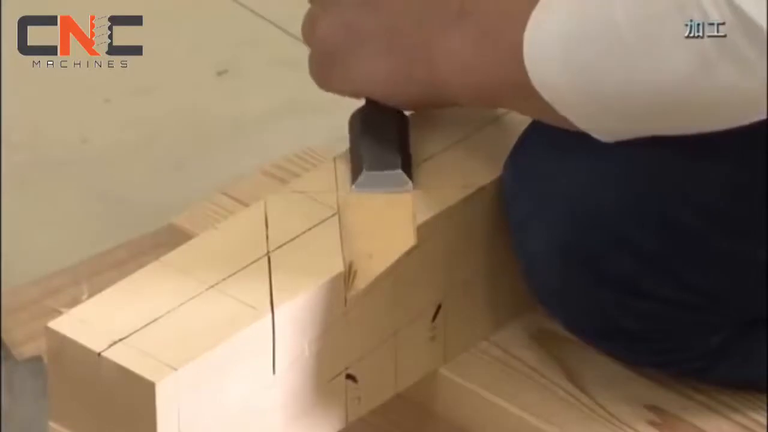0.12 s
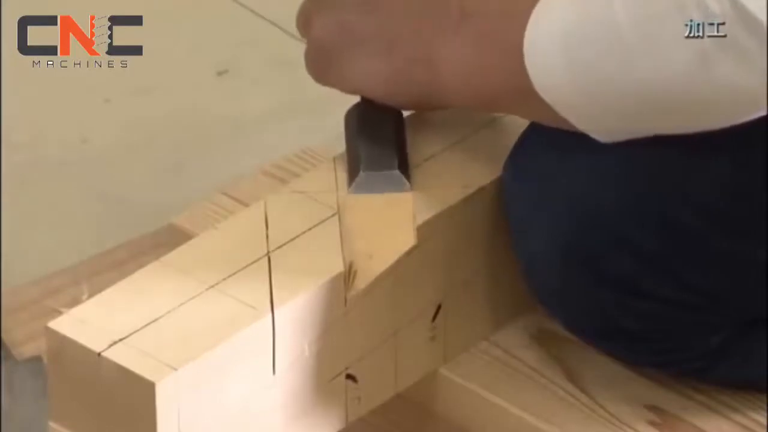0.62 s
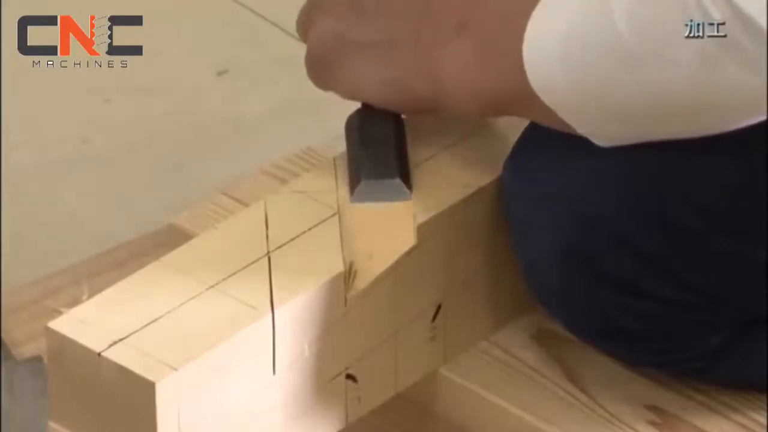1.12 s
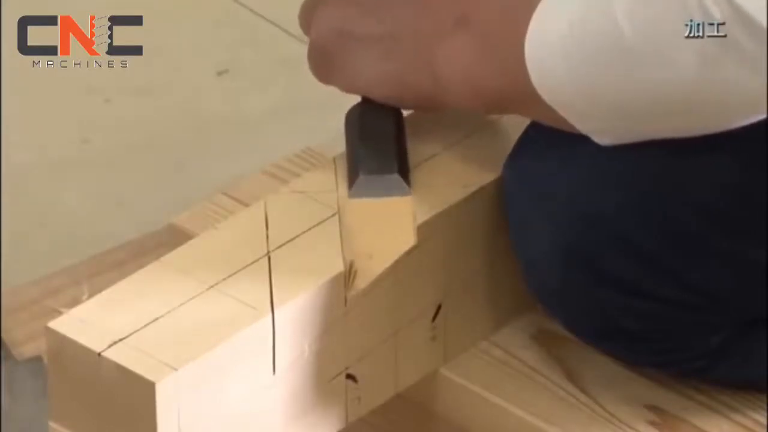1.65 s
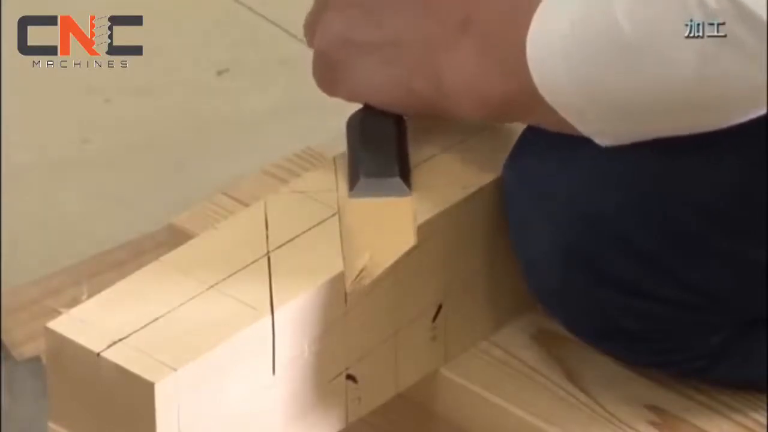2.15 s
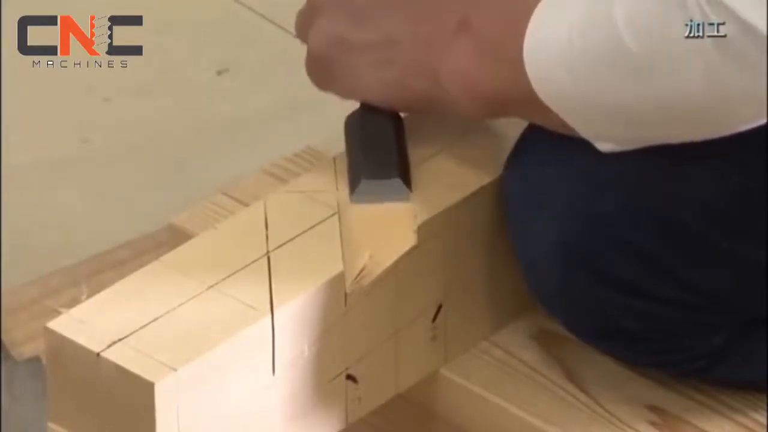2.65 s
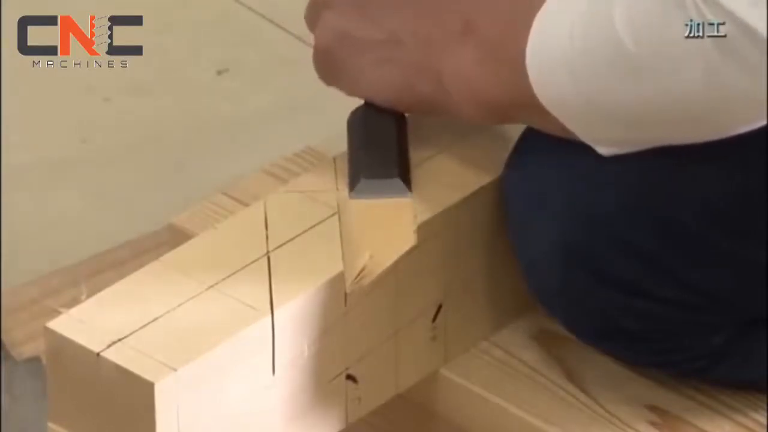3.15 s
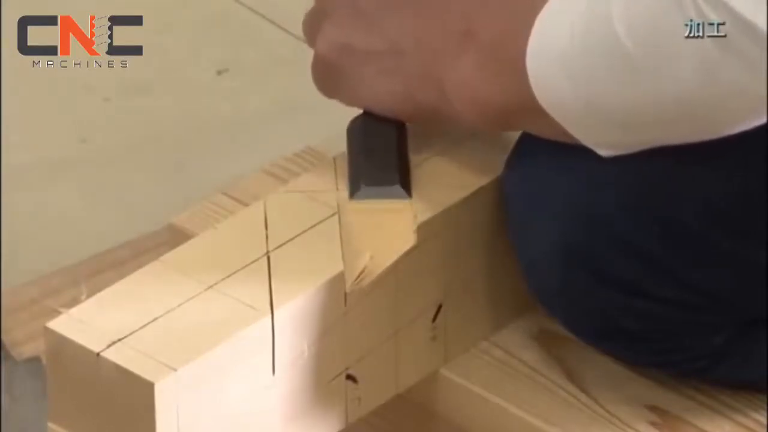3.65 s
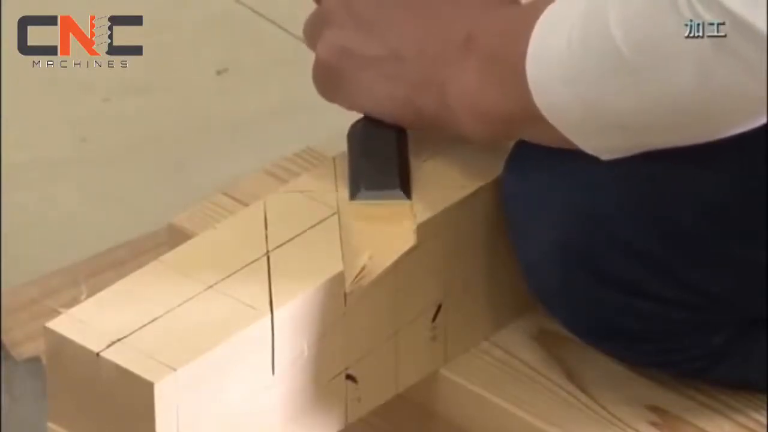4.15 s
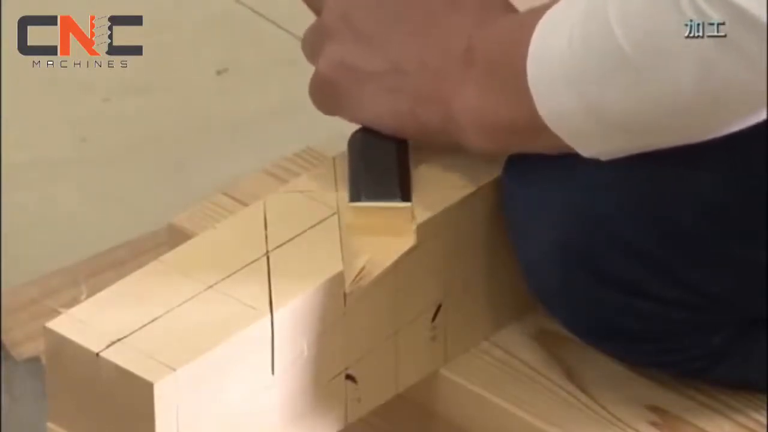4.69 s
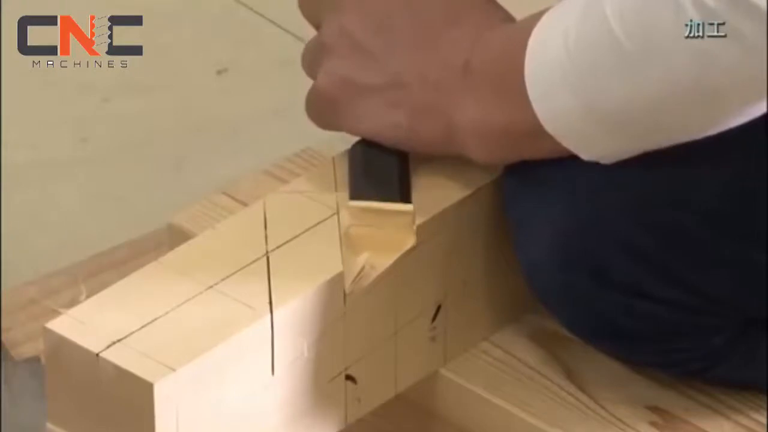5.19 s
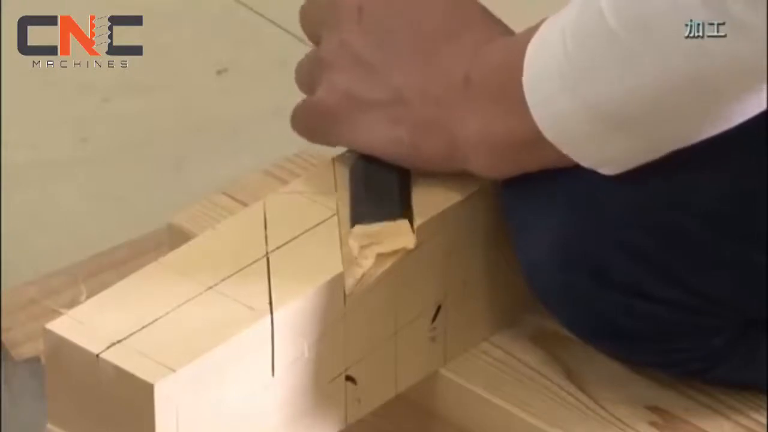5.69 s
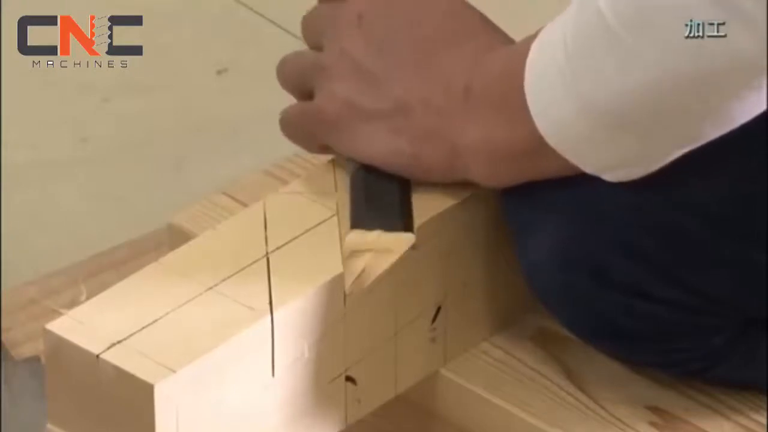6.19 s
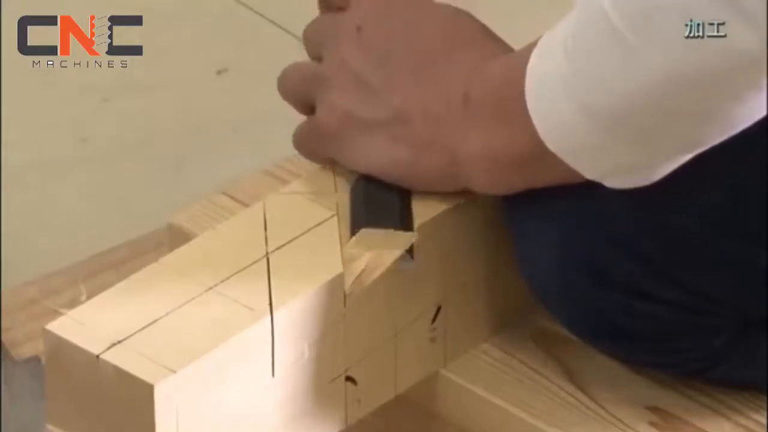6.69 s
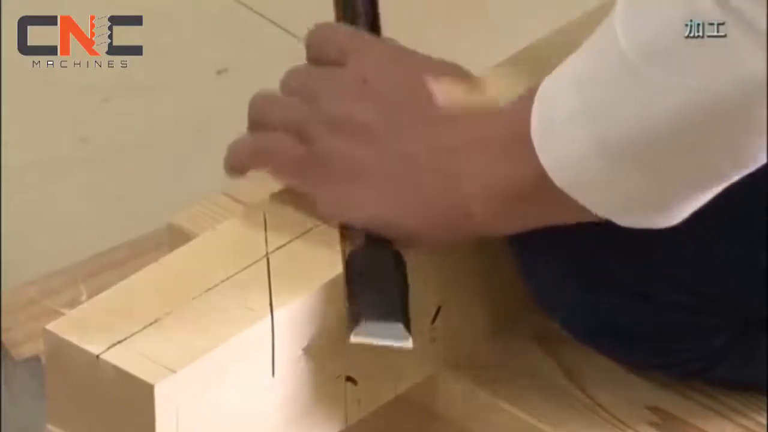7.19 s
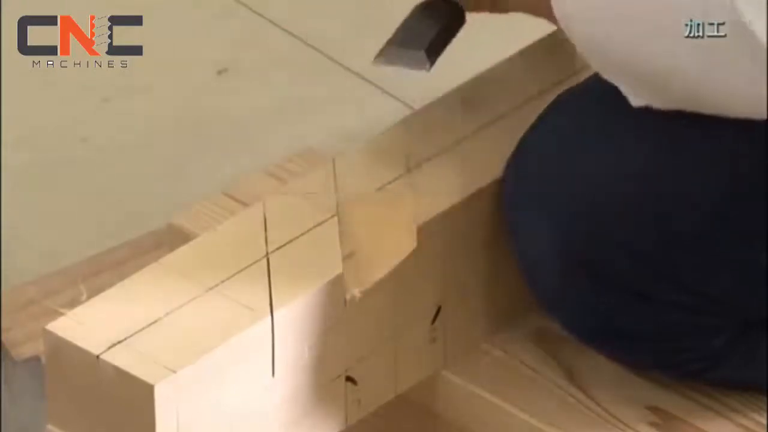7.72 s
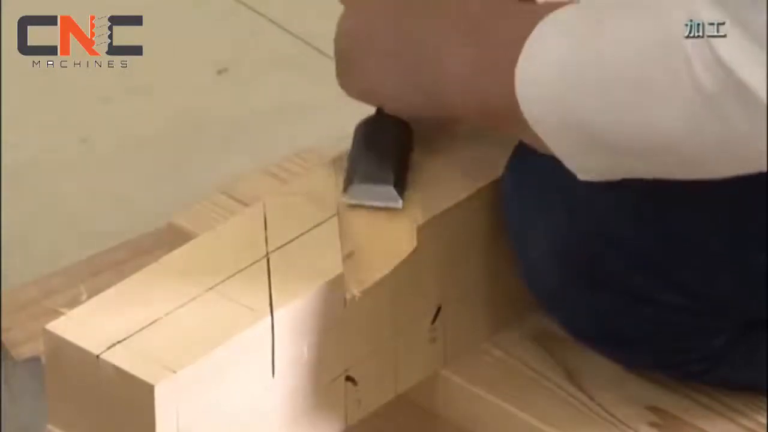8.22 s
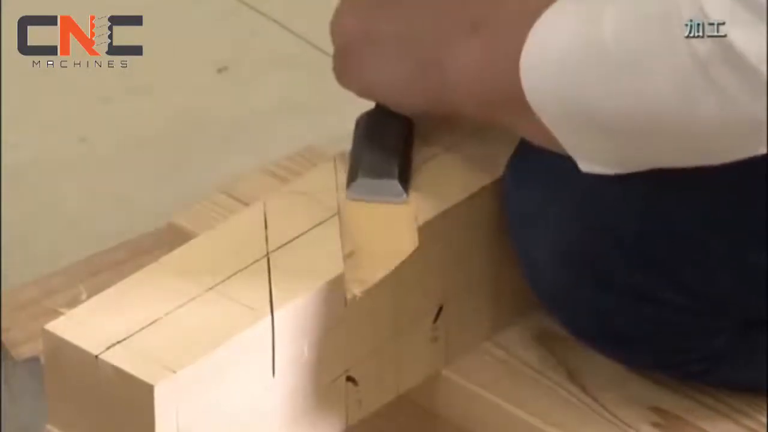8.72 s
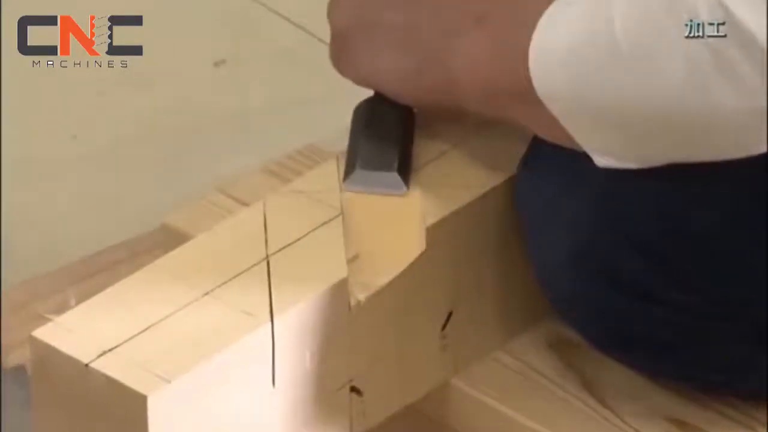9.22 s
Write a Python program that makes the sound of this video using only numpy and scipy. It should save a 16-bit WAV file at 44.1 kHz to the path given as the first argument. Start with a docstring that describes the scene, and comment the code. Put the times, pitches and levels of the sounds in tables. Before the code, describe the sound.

Quiet room hum, a low boom and dull knocks, then a single steel strike on a chisel bedded in a wooden beam, followed by bright rattling bounces of a wood scrap. After a pause the hammer falls four times a second or so, faster towards the end, with a tighter singing blade. Then small knocks and hand rubs on wood. Near microphone, echoing hall.

```python
"""Low workshop hum first, with small knocks and sleeve rustle. Then a steel hammer drives a wood chisel into a
timber beam in a large workshop: one blow, a loose offcut clattering down, a quickening run of blows, a few last
knocks and strokes. Struck bodies are sums of choked modes plus a noise crack; knocks are paired notes over noise;
hum, rustle and boom are shaped noise. Floor and bench echo the blows; a noise hall with a far wall rings on."""
import sys
import numpy as np
from scipy import signal
from scipy.fft import rfft, irfft
from scipy.io import wavfile
from scipy.ndimage import uniform_filter1d

SR = 44100
rng = np.random.default_rng(int(sys.argv[2]) if len(sys.argv) > 2 else 0)


def materialize(psi):
    """Save the field psi as 16-bit PCM at rate SR to the path in sys.argv[1].

    A 1-D psi becomes a single channel; in a 2-D psi each row is a channel.
    """
    bounded = np.clip(np.atleast_2d(psi).T, -1, 1)
    quanta = np.round(bounded * 32767).astype(np.int16)
    wavfile.write(sys.argv[1], SR, quanta)


N = 412335

# workshop hum spectrum: (frequency [Hz], relative density [dB per Hz])
HUM_SPECTRUM = [(20, -26.5), (45, -31), (75, -2), (130, -1.5), (200, -4), (350, -4), (530, -14.5),
                (1000, -17), (2000, -24), (4000, -26), (7300, -31.5), (11000, -42), (15000, -68)]
HUM_DB, HUM_WAVER_DB, HUM_WAVER_PER_S = -51.5, 1.2, 2.4

# sleeve and hand sweeping over timber: (middle [s], length [s], level [dB])
RUSTLE_STROKES = [(0.767, .1, -59), (0.924, 0.15, -56.5), (1.385, 0.094, -61), (2.87, 0.21, -57.5),
                  (2.976, .1, -60.5), (7.529, 0.16, -52.5), (7.69, 0.17, -53.5), (7.88, 0.09, -63.5),
                  (8.023, 0.21, -50), (8.21, 0.075, -64.5)]
# rustle spectrum: (frequency [Hz], relative density [dB per Hz])
RUSTLE_SPECTRUM = [(200, -25.5), (600, -7), (1500, -7), (3300, -7.5), (7900, -17.5), (14000, -42)]

# low booms near 190 Hz, the later ones faint: (time [s], level [dB])
LOW_BOOMS = [(0.115, -33.5), (0.275, -45), (0.58, -50), (8.48, -45.5)]
BOOM_HZ, BOOM_WIDTH_HZ = 188, 59
BOOM_RISE_S, BOOM_FADE_DB_PER_S = 0.019, 77

# dry chips snapping or landing: (time [s], level [dB])
CHIP_TICKS = [(2.965, -49.5), (7.238, -49.5), (7.434, -37), (7.582, -42.5), (7.618, -57)]
# tick spectrum: (frequency [Hz], relative density [dB per Hz])
TICK_SPECTRUM = [(300, -8), (1500, -3), (5500, -0.5), (9000, -11.5), (15000, -45.5)]
TICK_LAST_S, TICK_HALL_DB = 0.0045, -1

# small knocks of tool and timber:
# (time [s], level [dB], main note [Hz], second note [Hz], share sent to the hall [dB])
SMALL_KNOCKS = [(0.112, -35, 1640, 3390, 7.5), (.248, -34.5, 350, 1120, -9), (0.781, -40.5, 593, 185, 1.5),
                (1.269, -44, 362, 800, -13), (1.293, -34.5, 1730, 1165, -5),
                (1.356, -50.5, 3500, 1050, -0.8), (1.364, -49, 2524, 1500, 0),
                (2.286, -50, 1140, 408, 18.5), (2.707, -42, 836, 1385, -8), (2.745, -44.5, 361, 1030, -9),
                (7.06, -35, 1025, 630, -4), (7.256, -35, 292, 615, -14), (7.369, -43, 290, 550, 0),
                (7.434, -38.5, 654, 990, 4), (7.58, -43.5, 1075, 510, 5.5), (7.642, -41, 325, 507, -11),
                (7.662, -37, 232, 427, -8), (8.037, -46.5, 243, 494, 1.5), (8.249, -38, 330, 570, -2),
                (8.439, -41.5, 782, 1180, 3.5), (8.636, -41.5, 272, 780, -6), (8.739, -39.5, 303, 1007, -7)]
BODY_DB, BODY_DB_PER_OCTAVE = -6, 3   # noisy body at a main note of 1 kHz; higher knocks are noisier

# offcut bounces: (time [s], strength [dB], flat-face modes [dB re strength], top modes [dB re strength])
BOUNCES = [(2.306, -45, -1.5, -5), (2.3244, -11.5, -18, -21.5), (2.331, -12.5, -10, -29),
           (2.399, -13.5, -16.5, -3), (2.4215, -25.5, -14, -5), (2.428, -24, -7, -11),
           (2.489, -21, 2.8, -23), (2.518, -38.5, 10, -12), (2.54, -37.5, 8.5, -23), (2.564, -61, 26, -3)]
# offcut modes: (frequency [Hz], level [dB], lasting [s])
OFFCUT_MODES = [(638, 0, 0.0084), (1140, 0, 0.01), (1727, -2.5, 0.0094), (2750, -3, 0.012),
                (2907, -1.5, 0.0054), (3470, 7, 0.001), (3810, 3.5, 0.0029), (4450, -4, 0.0032),
                (5110, 2.5, 0.0045), (6240, -3, 0.0033), (7060, -4.5, 0.0038), (8440, -15.5, 0.0032)]
# borders between offcut mode groups: (frequency [Hz])
OFFCUT_BORDERS_HZ = [900, 2200, 3250, 4750]
MIDDLE_DB, LOWEST_DB = 1.5, -10.5   # middle modes lie between edge and face; the lowest follow them

# hammer blows: (time [s], strength [dB], handle ring [dB re strength], thump [dB re strength])
HAMMER_BLOWS = [(1.995, -11.5, 2.5, -32), (3.193, -13, -3.5, -7), (3.456, -13, -1.5, -31),
                (3.706, -17, 3, -27), (3.9785, -17.5, -1.3, -7), (4.2634, -15.5, -2.5, -10),
                (4.527, -14, 0.2, -12), (4.803, -14, 1, -34), (5.051, -14.5, 7, -27), (5.278, -15, 1, -30),
                (5.497, -16, -6, -39), (5.715, -15, -2.5, -30), (5.94, -14.5, -1.5, -21),
                (6.155, -15.5, -5, -16), (6.362, -17.5, -4, -35), (6.568, -17, 2, -5),
                (6.771, -16.5, -1.5, -17), (6.98, -18, -11, -10)]
# chisel and beam modes: (frequency [Hz], level [dB], lasting [s])
CHISEL_MODES = [(156.4, -11, 0.014), (299.4, -6, 0.011), (422, -8, 0.0044), (645, -9.5, 0.011),
                (963, -3.5, 0.0074), (1120, -5, 0.0053), (1707.5, 4, 0.0055), (2217, 5, 0.0047),
                (2380, 7.5, 0.0065), (2935, -8, 0.0066), (3270, -2.5, 0.0038), (4507, -7, 0.003),
                (5160, -15.5, 0.0042), (6756, -13.5, 0.0043), (11420, -32, 0.0036), (12700, -40, 0.01)]
# borders between thump, beam, handle, blade and upper modes: (frequency [Hz])
CHISEL_BORDERS_HZ = [220, 1400, 2000, 2600]
# the blade beds in, the beam answers more and the gripped blade sings, until the chip splits off:
# (time [s], beam modes [dB re strength], blade modes [dB re strength])
BLADE_BEDDING = [(2.0, -4.5, -28.5), (3.2, -2.5, -24), (3.6, -9, -38.5), (4.8, -5.5, -23.5),
                 (5.28, -1.5, -12), (5.5, -3.5, -8), (6.36, -3, -6.5), (6.77, -8.5, -19), (7.0, -6, -13.5)]
# crack of steel on steel and splitting fibres: (frequency [Hz], relative density [dB per Hz])
CRACK_SPECTRUM = [(100, -3.5), (400, -3), (1300, -2.5), (3200, -2.5), (5500, -9), (8000, -16.5),
                  (11000, -30), (13400, -40), (15500, -67)]
DETUNE, MODE_SPREAD_DB = 0.008, 2.9   # strike-to-strike spread of mode pitch [ratio] and level
BEAMING_HZ = 4000

# floor and bench: (delay [s], level [dB])
NEAR_ECHOES = [(0.0093, -13.5), (0.016, -25.5)]
# hall: (frequency [Hz], relative level [dB], t60 [s])
HALL_BANDS = [(100, -12.5, 0.58), (260.7, 4, 0.73), (722, 1.5, 0.53), (1800, -3.5, 0.65), (4650, -1, 0.55),
              (9160, 4, 0.37), (14030, 2.5, 0.2)]
HALL_DB, BASS_CUT_HZ = -8, 119
FAR_WALL_S, FAR_WALL_DB = 0.047, 2.25
CONTACT_SAMPLES = 2048


def from_db(db):
    """Decibels to gain."""
    return 10 ** (np.asarray(db) / 20)


def rms_one(x):
    """Scale to rms 1."""
    return x / np.sqrt(np.mean(x ** 2) + 1e-20)


def at_hz(points, hz, column=1):
    """Read a spectrum table on a log-frequency axis."""
    table = np.array(points)
    return np.interp(np.log(np.maximum(hz, 1)), np.log(table[:, 0]), table[:, column])


def coloured(x, spectrum):
    """Give white noise a spectrum; rms 1."""
    gain = from_db(at_hz(spectrum, np.fft.rfftfreq(len(x), 1 / SR)))
    return rms_one(irfft(rfft(x) * gain, len(x)))


def drift(rate_per_s):
    """Wavering line joining independent random points of spread 1, two per rate period."""
    points = int(N / SR * rate_per_s * 2) + 2
    return np.interp(np.arange(N), np.linspace(0, N, points), rng.standard_normal(points))


def contact(rise_s, last_s):
    """Envelope of a damped contact: it swells, then the grip chokes it ever faster; top 1."""
    t = np.arange(CONTACT_SAMPLES) / SR
    choked = (1 - np.exp(-t / rise_s)) * np.exp(-(t / last_s) ** 2.54)
    free = (1 - np.exp(-t / 0.002)) * np.exp(-t / (2.1 * last_s))   # a little rings on freely
    shape = choked + from_db(-23.5) * free
    shape *= np.cos(np.pi / 2 * np.arange(CONTACT_SAMPLES) / CONTACT_SAMPLES)
    return shape / shape.max()


def ring(hz, rise_s, last_s):
    """A struck mode: a sine from a random phase under a contact envelope of height 1."""
    shape = contact(rise_s, last_s)
    return shape * np.sin(2 * np.pi * (hz * np.arange(len(shape)) / SR + rng.random()))


def puff(spectrum, rise_s, last_s):
    """Coloured noise of rms 1 under a contact envelope."""
    shape = contact(rise_s, last_s)
    return shape * coloured(rng.standard_normal(len(shape)), spectrum)


def add(out, s, sound):
    """Mix a sound in at a time."""
    at = round(s * SR)
    out[at:at + len(sound)] += sound[:N - at]


def workshop_hum():
    """Steady coloured noise whose level wavers."""
    level_db = HUM_DB + HUM_WAVER_DB * drift(HUM_WAVER_PER_S)
    return from_db(level_db) * coloured(rng.standard_normal(N), HUM_SPECTRUM)


def swell(middle_s, length_s, db):
    """A stroke swells and fades as a bell curve."""
    t = np.arange(N) / SR
    return from_db(db) * np.exp(-(3 * (t - middle_s) / length_s) ** 2 / 2)


def rustle():
    """Cloth drags in fine grains: noise of fast-varying level under the strokes."""
    grains = rng.standard_normal(N) * from_db(1.7 * drift(170))
    strokes = sum(swell(*row) for row in RUSTLE_STROKES)
    return strokes * coloured(grains, RUSTLE_SPECTRUM)


def boom():
    """Noise through one low resonance, twice; each boom swells and fades."""
    radius, angle = np.exp(-np.pi * BOOM_WIDTH_HZ / SR), 2 * np.pi * BOOM_HZ / SR
    x = rng.standard_normal(N)
    for _ in range(2):
        x = signal.lfilter([1, 0, -1], [1, -2 * radius * np.cos(angle), radius ** 2], x)
    envelope = np.zeros(N)
    for s, db in LOW_BOOMS:
        since_s = np.maximum(np.arange(N) / SR - s, 0)
        envelope += np.minimum(since_s / BOOM_RISE_S, 1) * from_db(db - BOOM_FADE_DB_PER_S * since_s)
    return rms_one(x) * envelope


def ticks():
    """Dry chips give short bright noise snaps; rows: direct, sent to the hall."""
    out = np.zeros(N)
    for s, db in CHIP_TICKS:
        add(out, s, from_db(db) * puff(TICK_SPECTRUM, 0.00039, TICK_LAST_S))
    return out * from_db([[0], [TICK_HALL_DB]])


def note(hz):
    """A wooden note is a pair of close, damped modes that beat; high notes are choked sooner."""
    shorten = min(1, (800 / hz) ** 0.6)
    lower = ring(hz, 0.002, 0.0098 * shorten)
    upper = ring(hz * 1.06, 0.0034 * shorten, 0.019 * shorten)
    return lower + from_db(-7) * upper


def knocks():
    """Two dull wooden notes over a noisy body that fades above the higher note; rows: direct, sent to the hall."""
    out = np.zeros((2, N))
    for s, db, main_hz, second_hz, hall_db in SMALL_KNOCKS:
        top_hz = max(main_hz, second_hz)
        spectrum = [(100, -15), (400, 0), (top_hz * 1.27 + 200, -4), (top_hz * 3 + 900, -30), (SR / 2, -75)]
        body = puff(spectrum, 0.0005, 0.019)
        body_db = BODY_DB + BODY_DB_PER_OCTAVE * np.log2(main_hz / 1000)
        sound = note(main_hz) + from_db(-2.5) * note(second_hz) + from_db(body_db) * body
        add(out[0], s, from_db(db) * sound)
        add(out[1], s, from_db(db + hall_db) * sound)
    return out


def strikes(events, modes, borders_hz, rise_s, crack_db, crack_s, far_crack_db, far_modes_db):
    """A crack at once, modes that swell and are soon choked. Row 0 is heard direct; row 1 leaves in all other
    directions, where the crack averages to a smooth click."""
    out = np.zeros((2, N))
    click = irfft(from_db(at_hz(CRACK_SPECTRUM, np.fft.rfftfreq(CONTACT_SAMPLES, 1 / SR))))
    click = np.roll(click, CONTACT_SAMPLES // 32)
    click /= np.sqrt(np.sum(click ** 2))
    for s, *group_db in events:
        notes = far_notes = 0
        for hz, mode_db, last_s in modes:
            level_db = mode_db + group_db[np.searchsorted(borders_hz, hz)] + rng.normal(0, MODE_SPREAD_DB)
            mode = from_db(level_db) * ring(hz * rng.normal(1, DETUNE), rise_s, last_s)
            notes = notes + mode
            # high modes beam, the hall gets less of them
            far_notes = far_notes + mode / (1 + (hz / BEAMING_HZ) ** 4)
        sharp_db = max(group_db[-2:])
        crack = from_db(crack_db + sharp_db) * puff(CRACK_SPECTRUM, 0.00012, crack_s)
        add(out[0], s, notes + crack)
        add(out[1], s, from_db(far_modes_db) * far_notes + from_db(far_crack_db + sharp_db) * click)
    return out


def clatter():
    """Offcut bounces: each is abrupt and lands on another corner, so its mode groups differ in level."""
    s, db, face_db, top_db = np.transpose(BOUNCES)
    middle_db = db + face_db / 2 + MIDDLE_DB
    events = np.transpose([s, middle_db + LOWEST_DB, db + face_db, middle_db, db, db + top_db])
    return strikes(events, OFFCUT_MODES, OFFCUT_BORDERS_HZ, rise_s=0.00026, crack_db=-2.2, crack_s=0.0051,
                   far_crack_db=19.9, far_modes_db=-11.5)


def blows():
    """The hammer loads the chisel over a few milliseconds; the bedding of the blade sets beam and blade modes."""
    s, db, handle_db, thump_db = np.transpose(HAMMER_BLOWS)
    times_s, beam_db, blade_db = np.transpose(BLADE_BEDDING)
    beam_db = np.interp(s, times_s, beam_db)
    blade_db = np.interp(s, times_s, blade_db)
    events = np.transpose([s, db + thump_db, db + beam_db, db + handle_db, db + blade_db, db])
    return strikes(events, CHISEL_MODES, CHISEL_BORDERS_HZ, rise_s=0.0029, crack_db=1.0, crack_s=0.0064,
                   far_crack_db=21.84, far_modes_db=-1.86)


def near_echoes(x):
    """Floor and bench each send the sound back once."""
    out = np.zeros(N)
    for delay_s, db in NEAR_ECHOES:
        out += from_db(db) * np.pad(x, (round(delay_s * SR), 0))[:N]
    return out


def hall(x):
    """Diffuse noise that dies by half-octave band and swells briefly when the far wall answers."""
    t, response = np.arange(SR) / SR, np.zeros(SR)
    edges_hz = 70 * 2 ** np.arange(0, 8.1, 0.5)
    white = rng.standard_normal((2, SR))   # neighbouring bands take different noise
    for k, (low, high) in enumerate(zip(edges_hz, edges_hz[1:])):
        sos = signal.butter(2, [low, high], "band", fs=SR, output="sos")
        band = signal.sosfilt(sos, white[k % 2])
        hz = np.sqrt(low * high)
        response += band * from_db(at_hz(HALL_BANDS, hz) - 60 * t / at_hz(HALL_BANDS, hz, column=2))
    onset = np.clip((t - 0.009) / 0.0079, 0, 1)
    late = np.clip((t - FAR_WALL_S) / 0.011, 0, 1)
    wall_db = FAR_WALL_DB * late * np.exp(-(t - FAR_WALL_S) / 0.021)
    response *= onset * from_db(wall_db)
    response *= from_db(HALL_DB) / np.sqrt(np.sum(response ** 2))
    return signal.fftconvolve(x, response)[:N]


def scene():
    """Struck sounds with their echoes and hall, over boom, rustle and hum."""
    hammer = blows()
    direct, spread = hammer + clatter() + knocks() + ticks()
    struck = direct + near_echoes(hammer[0]) + hall(spread)
    # the microphone's high-pass thins the deep bass of struck sounds
    struck = signal.sosfilt(signal.butter(3, BASS_CUT_HZ, "high", fs=SR, output="sos"), struck)
    return (struck + boom() + rustle() + workshop_hum())[None]


def band_limit(x):
    """A steep low-pass at the top of the band."""
    return signal.sosfilt(signal.butter(12, 15670, fs=SR, output="sos"), x)


def record(dry):
    """Gain control ducks after loud sounds and creeps back; peaks are rounded."""
    level_db = 10 * np.log10(uniform_filter1d(dry[0] ** 2, size=256) + 1e-12)
    over_db = np.maximum(level_db + 32.5, 0) * 0.075
    recover_db = 14.0 * np.arange(N) / SR   # 14 dB per s
    duck_db = np.maximum.accumulate(over_db + recover_db) - recover_db   # peak hold, falling steadily
    keep = np.exp(-1 / (0.0044 * SR))   # 4.4 ms lag
    duck_db = signal.lfilter([1 - keep], [1, -keep], duck_db)
    mix = 1.326 * np.tanh(dry * from_db(-duck_db) / 1.3)
    return band_limit(mix)


dry = scene()
out = record(dry)
materialize(out)
```